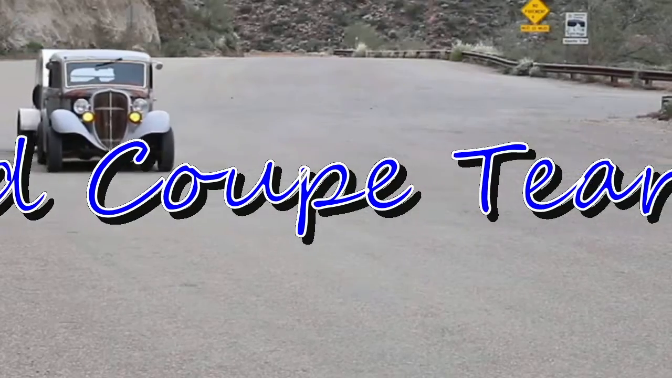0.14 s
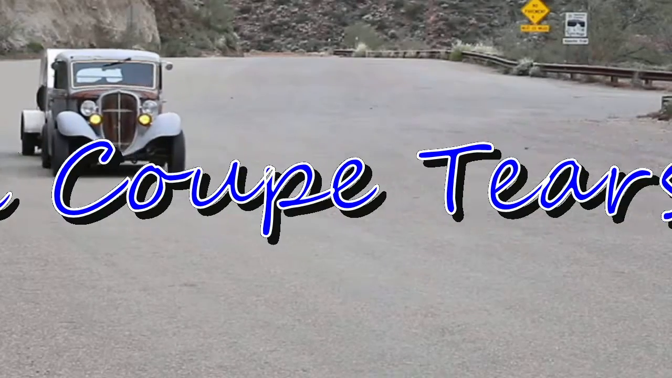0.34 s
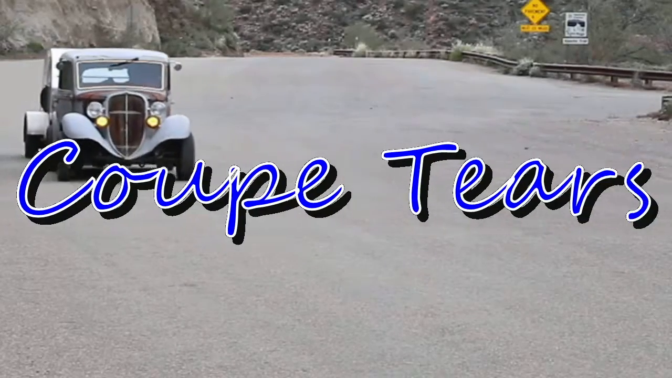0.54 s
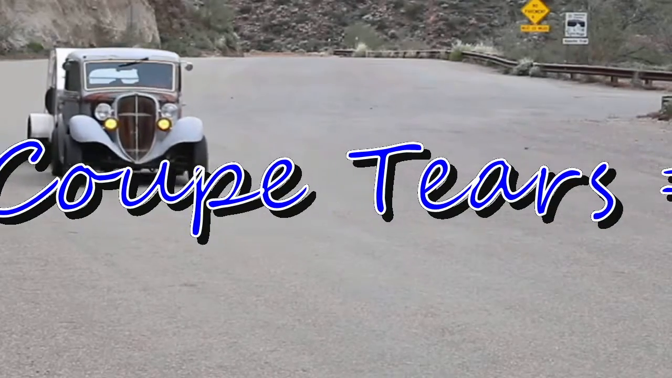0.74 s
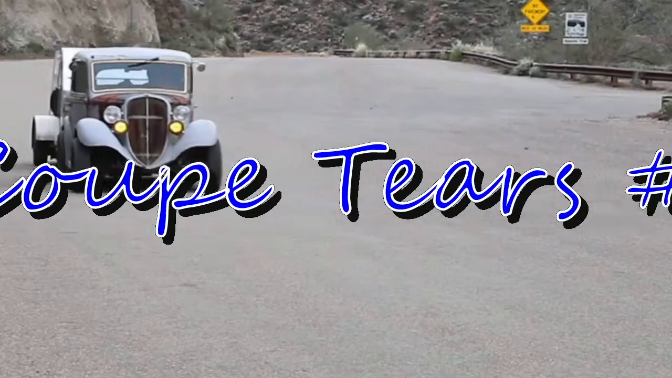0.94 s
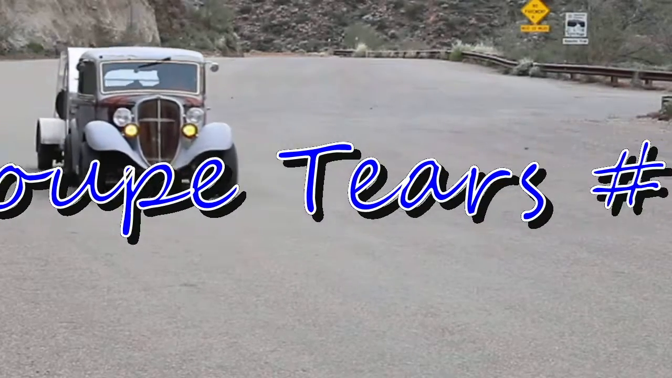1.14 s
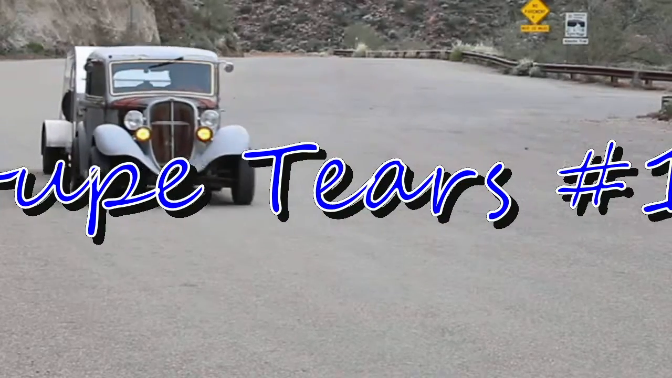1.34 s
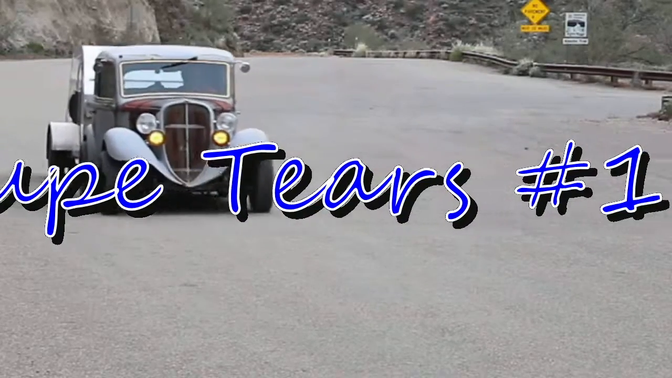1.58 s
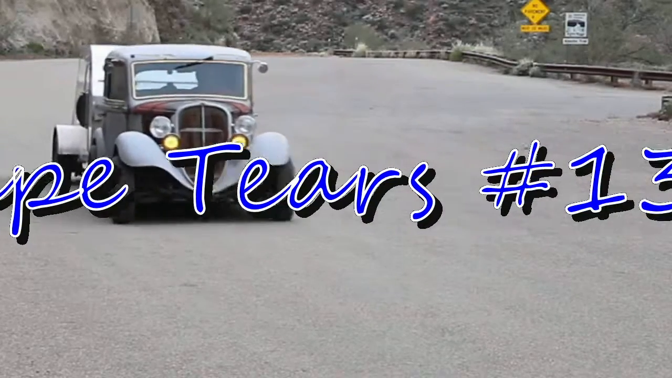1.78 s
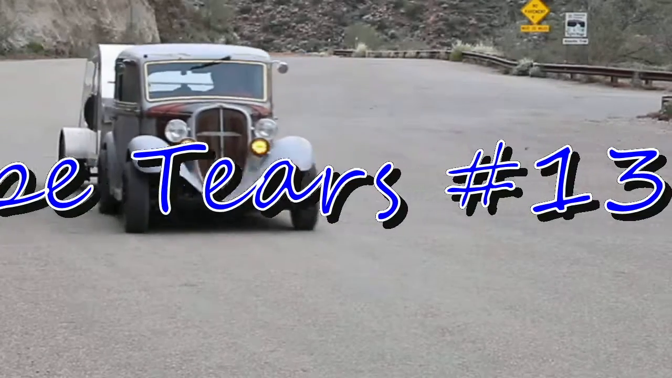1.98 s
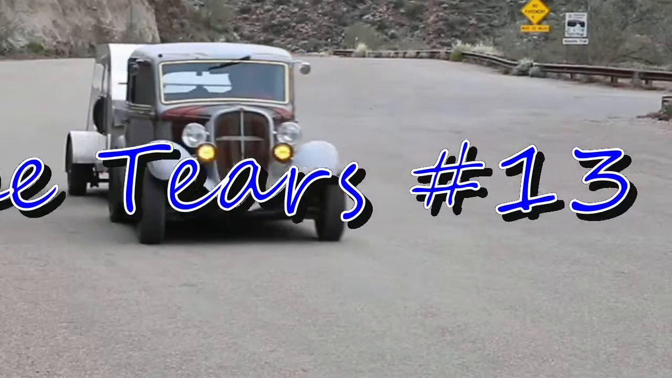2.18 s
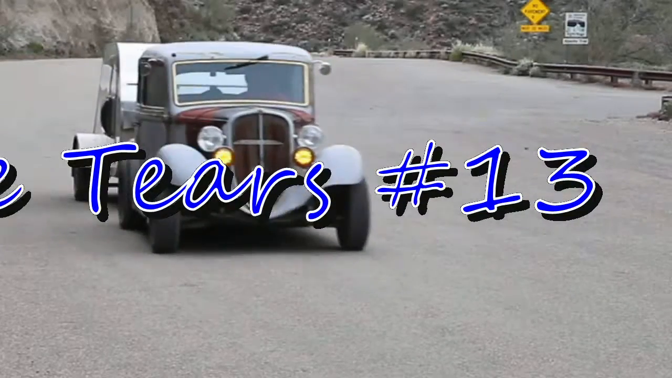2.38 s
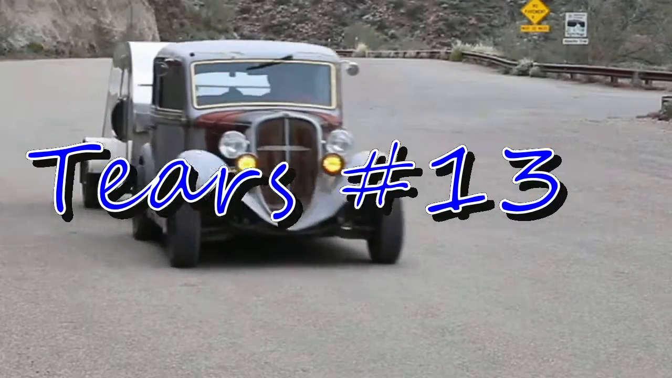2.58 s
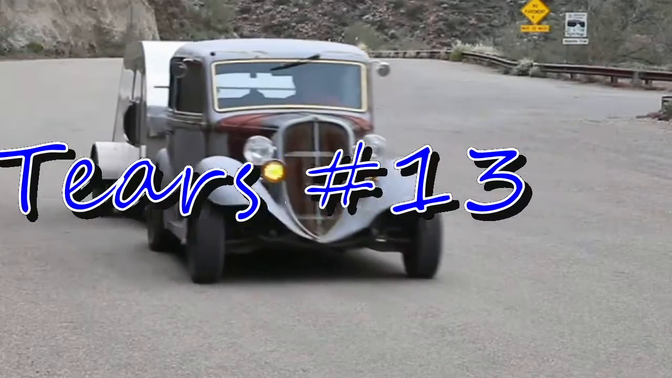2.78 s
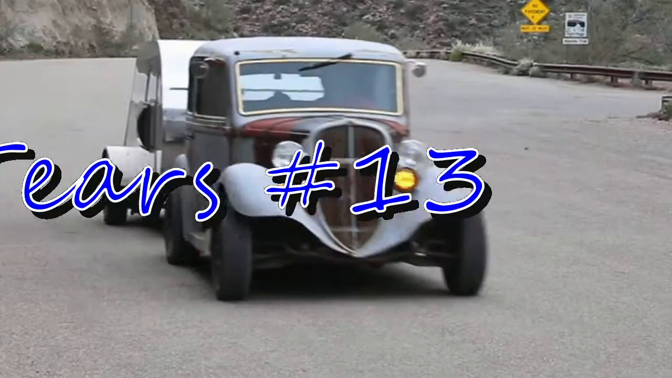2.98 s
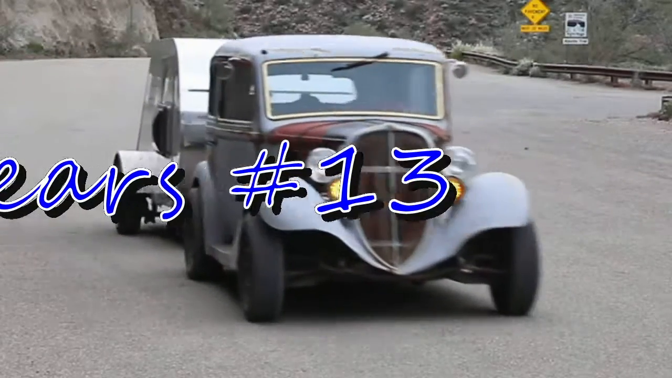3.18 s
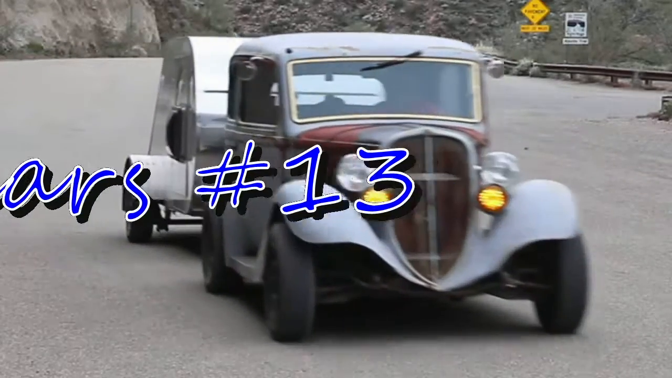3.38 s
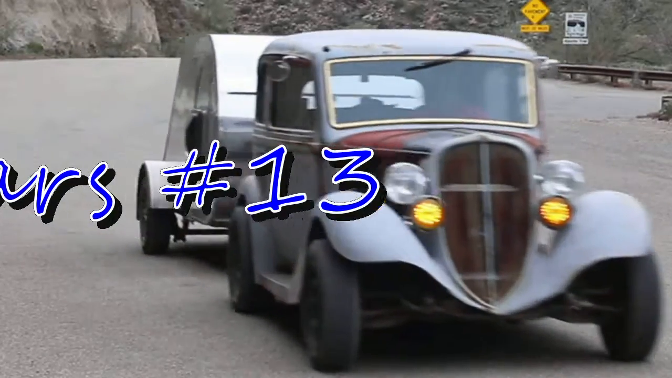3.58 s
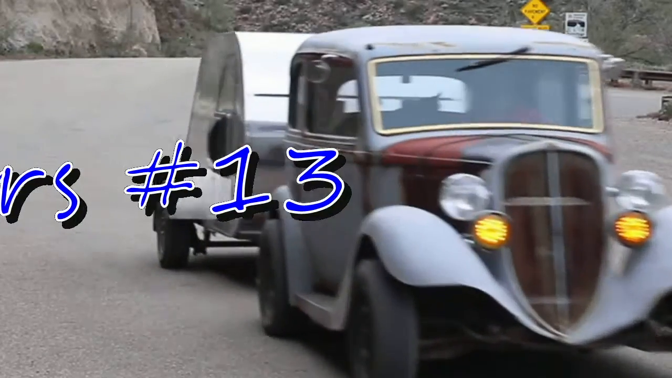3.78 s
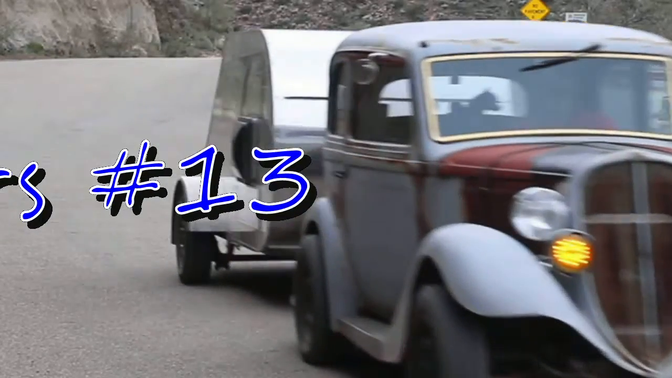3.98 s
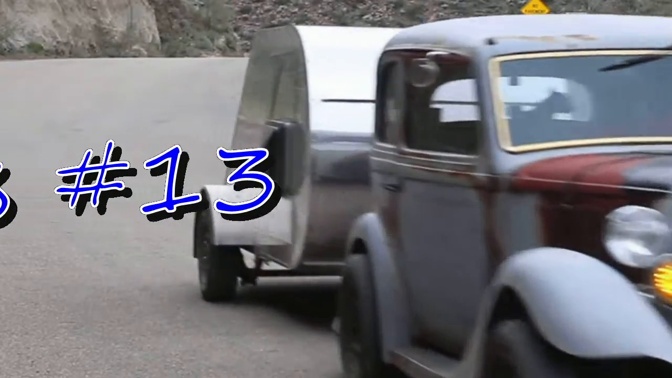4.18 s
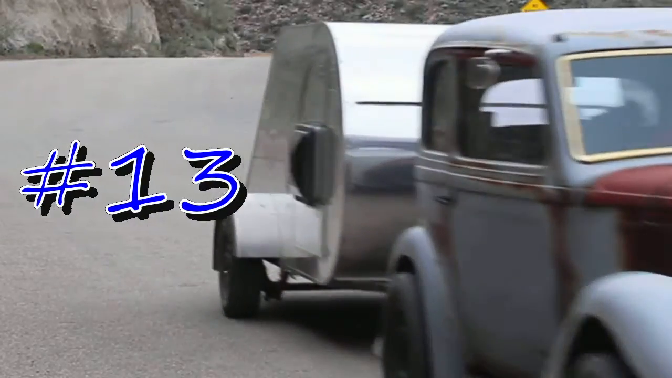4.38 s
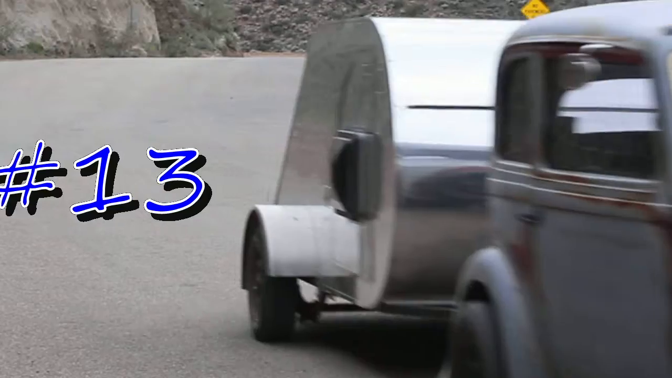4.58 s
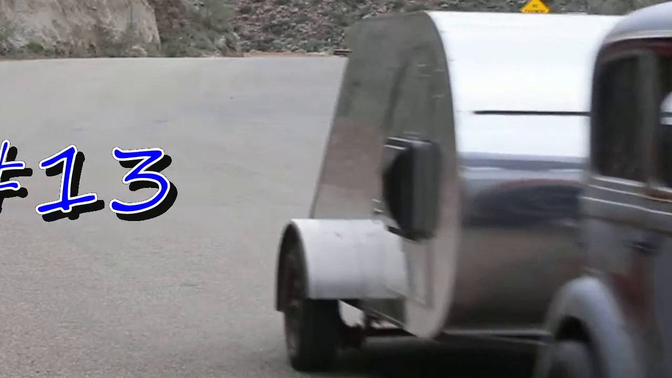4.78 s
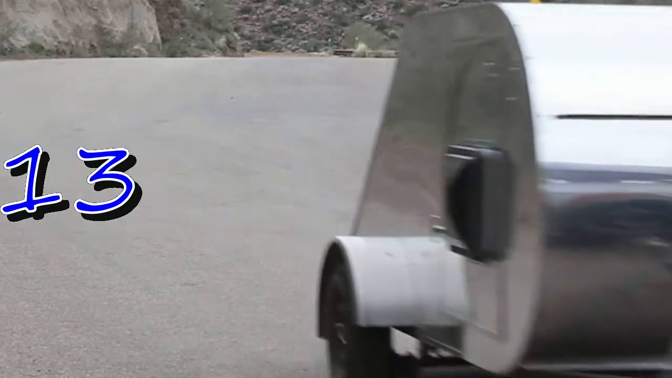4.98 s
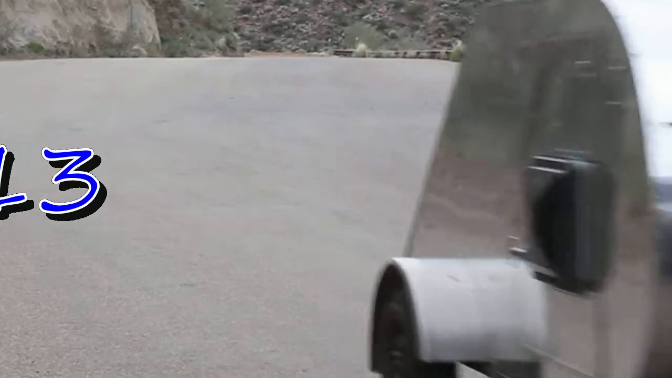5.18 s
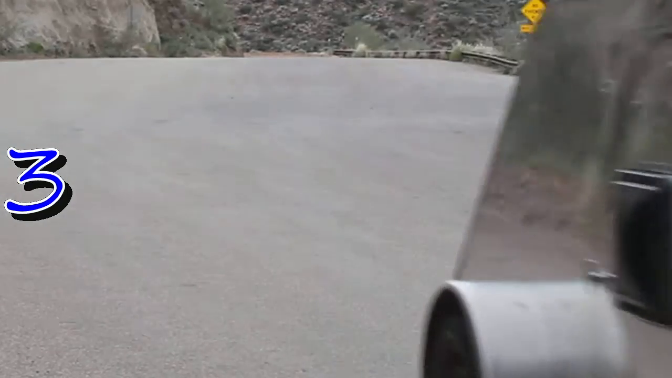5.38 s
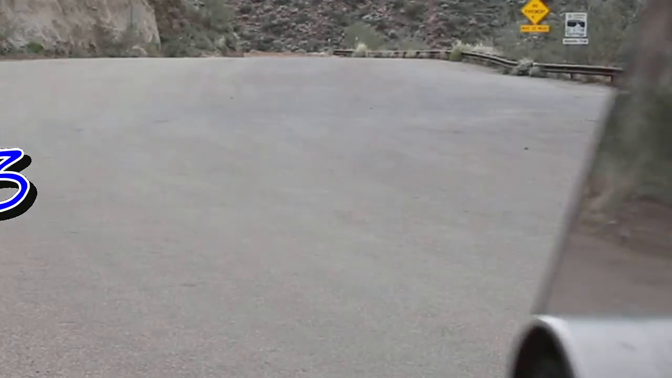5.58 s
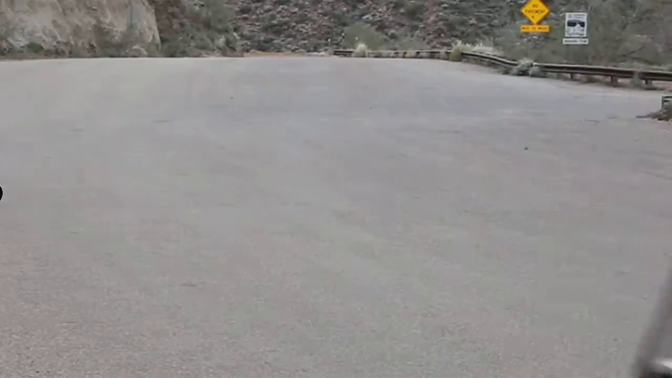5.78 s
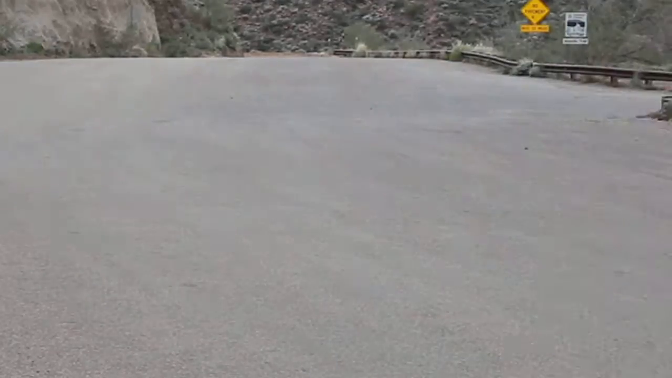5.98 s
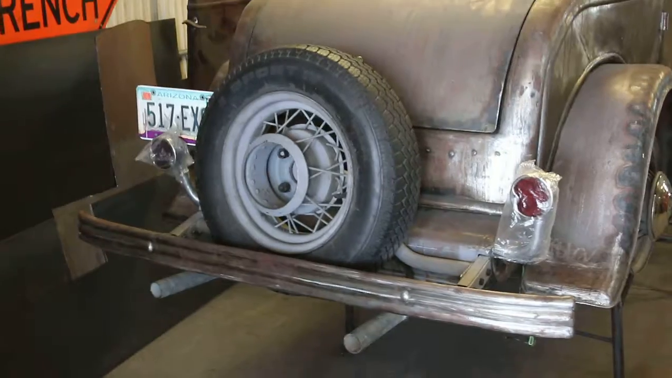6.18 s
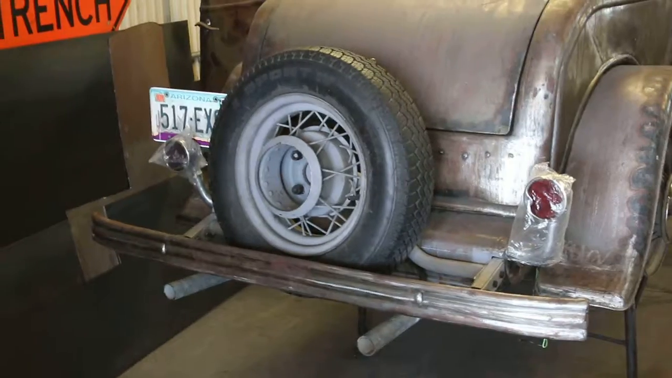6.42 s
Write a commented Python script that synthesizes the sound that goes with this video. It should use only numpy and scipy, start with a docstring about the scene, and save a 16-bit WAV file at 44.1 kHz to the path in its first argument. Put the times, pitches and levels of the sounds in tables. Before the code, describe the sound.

An old car rolls slowly past with a low exhaust drone, its tyres crunching grit and flicking small stones, then fades away.

```python
"""A low exhaust drone draws near as an old small car with a trailer rolls slowly by on a gritty mountain road.
The drone is a stack of engine orders; the engine bay whirrs, fan and gears whine, and the tyres crunch
grit and flick stones. Once past, the body hides the engine and puffs of gas ring in the tailpipe.
The road fades out and a workshop fades in: room noise, a machine hum and two small ticks."""
import sys
import numpy as np
from scipy import signal
from scipy.fft import rfft, irfft
from scipy.io import wavfile

SR = 44100
rng = np.random.default_rng(int(sys.argv[2]) if len(sys.argv) > 2 else 0)


def wrap_up_sound(samples):
    """Save the sound to the file named by the first command line argument, as 16-bit audio."""
    columns = np.atleast_2d(samples).T
    # keep every value between -1 and 1, then stretch to whole-number steps
    tamed = np.clip(columns, -1, 1)
    steps = np.round(tamed * 32767).astype(np.int16)
    wavfile.write(sys.argv[1], SR, steps)


N = 284445
T = np.arange(N) / SR
HZ = np.maximum(np.arange(N // 2 + 1) * SR / N, 1)
TAIL_TURNS_S = 4.996  # the car's tail starts to swing toward the listener


def from_db(db):
    """Decibels to gain."""
    return 10 ** (np.asarray(db) / 20)


def rms_one(x):
    """Scale to unit rms."""
    return x / np.sqrt(np.mean(x ** 2) + 1e-20)


def over_hz(points):
    """Draw a curve through (frequency, value) points on a log frequency axis."""
    hz, value = np.transpose(points)
    return np.interp(np.log(HZ), np.log(hz), value)


def drift(rate_hz):
    """Smooth random wander of unit rms."""
    return rms_one(irfft(rfft(rng.standard_normal(N)) / (1 + (HZ / rate_hz) ** 2), N))


def ring(clicks, hz, t60):
    """A resonator: each click starts a decaying sine of its own height."""
    radius, step = from_db(-60 / (t60 * SR)), 2 * np.pi * hz / SR
    return signal.lfilter([0, np.sin(step)], [1, -2 * radius * np.cos(step), radius ** 2], clicks + 1e-18)


def coloured(drive, gain):
    """Equalise a drive into stereo, left at unit rms; the right port hears it partly scattered."""
    # how alike the two microphone ports sound: (frequency [Hz], likeness [ratio, capped at 1])
    likeness = [(250, 1.3), (500, 0.85), (1000, 0.8), (2000, 0.6346), (4500, 0.71), (7500, 0.07),
                (12000, 0.8)]
    alike = np.clip(over_hz(likeness), 0, 1)
    direct, scattered = rfft(rms_one(drive)), rfft(rng.standard_normal(N))
    right = alike * direct + np.sqrt(1 - alike ** 2) * scattered
    pair = irfft(gain * np.array([direct, right]), N)
    return pair / pair[0].std()


def distance_db(s, speed_m_per_s=2.97, closest_m=2.73, closest_s=4.9):
    """Distance loss of a car rolling along a straight line, 0 dB at the closest point."""
    return -20 * np.log10(np.hypot(1, speed_m_per_s * (s - closest_s) / closest_m))


def swell_db(crest_s, apex_db, rise, fall, round_s=0.19):
    """A rise and a fall in dB per second, rounded off below the apex where the two slopes meet."""
    past = round_s * np.logaddexp(0, (T - crest_s) / round_s)
    return apex_db + rise * (T - crest_s) - (rise + fall) * past


def reflected(x, strength, rate_hz=1.52, count=5, longest_s=.005, wander_s=0.000493):
    """Bounces between road and underbody, whose paths shift as the car rolls, ripple the spectrum."""
    delays = rng.uniform(0.206, 1, count) * longest_s
    return x + strength * sum(np.interp(T - delay - wander_s * drift(rate_hz), T, x) for delay in delays)


def order_tone(turns, order, rough, rate_hz=9, silencer_spread=0.145):
    """One engine order, shaken by uneven firing; the silencer's phase shift smears each beat in time."""
    angle = 2 * np.pi * (order * turns + silencer_spread * order ** 2)
    in_phase = (1 + rough * drift(rate_hz)) * np.cos(angle)
    return -np.sqrt(2) * (in_phase + rough * drift(rate_hz) * np.sin(angle))


def workshop(level_db=-47, right_db=0.3):
    """Ringing room tone with a machine hum."""
    # hum partials: (frequency [Hz], rms level [dB])
    partials = [(119.5, -76), (143, -62), (222, -70), (357, -59)]
    # room tone spectrum: (frequency [Hz], relative level [dB])
    spectrum = [(30, -27), (80, -2), (140, 13.5), (190, 0), (245, 4.5), (290, -4.5), (360, 2), (550, -7),
                (1100, -12), (2000, -15), (2900, -15.5), (3650, -22.5), (4400, -29), (8000, -37.5),
                (16000, -51)]
    # room resonances: (frequency [Hz], width [Hz], lift [dB])
    resonances = [(1000, 50, 4), (1310, 45, 6), (1940, 49, 10), (3400, 88, 9)]
    hum = sum(from_db(db) * np.sqrt(2) * np.sin(2 * np.pi * (hz * T + rng.random()))
              for hz, db in partials)
    lift_db = sum(db / (1 + ((HZ - hz) / width) ** 2) for hz, width, db in resonances)
    room = coloured(rng.standard_normal(N), from_db(over_hz(spectrum) + lift_db))
    return from_db([[level_db], [level_db + right_db]]) * room + hum


def ticks(trim_db=-11):
    """Two light, hard touches in the workshop, each ringing for an instant."""
    # touches: (time [s], strike level [dB])
    touches = [(6.263, -33), (6.426, -31)]
    # modes they excite: (frequency [Hz], gain [dB], t60 [s])
    modes = [(2650, -2, .009), (3450, 3.5, 0.0082), (6160, -11, 0.0097)]
    clicks = np.zeros(N)
    for s, db in touches:
        clicks[int(s * SR)] = from_db(db)
    return sum(from_db(db + trim_db) * ring(clicks, hz, t60) for hz, db, t60 in modes)


def hiss(floor_db=-70.5):
    """A steady faint hiss, and a fine hiss from the front of the car that crests early."""
    # hiss spectrum: (frequency [Hz], relative level [dB])
    spectrum = [(3000, -23), (6500, 4.5), (8000, 4.5), (10000, -1.5), (15500, 2)]
    front_db = swell_db(crest_s=3.7, apex_db=-64, rise=4.5, fall=3.5)
    gain = np.hypot(from_db(floor_db), from_db(front_db))
    return gain * coloured(rng.standard_normal(N), from_db(over_hz(spectrum)))


def whine(turns):
    """High, unsteady orders of the fan and gears."""
    # swells: (order [x beat rate], crest [s], apex [dB], rise [dB/s], fall [dB/s])
    orders = [(14, 3.56, -52, 5, 0.3), (15, 3.5, -66, 3, 6), (17, 3.8, -54, 13, 7), (18, 5.0, -52, 5, 3)]
    return sum(from_db(swell_db(*swell)) * order_tone(turns, round(k), rough=0.55, rate_hz=9.7)
               for k, *swell in orders)


def engine_bay(turns, throb=0.049):
    """A mechanical whirr that throbs with the firing."""
    # whirr spectrum: (frequency [Hz], relative level [dB])
    spectrum = [(20, -8), (60, -25), (110, 4), (170, 0.5), (300, 6), (370, 4.5), (450, -1), (800, 0),
                (1000, -3.5), (1500, -16.5), (2500, -44), (6000, -38)]
    pulsed = rng.standard_normal(N) * (1 + throb * np.cos(2 * np.pi * turns))
    return coloured(pulsed, from_db(over_hz(spectrum)))


def chinks(turns, per_s, shake, count=32, spread_db=3.8):
    """Loose metal parts, shaken by the engine, chink densely at many pitches."""
    hits = rng.random(N) < per_s * (1 + shake * np.cos(2 * np.pi * turns)) / SR
    clicks = hits * from_db(spread_db * np.minimum(rng.exponential(1, N), 2.5)) * rng.choice([-1, 1], N)
    part = rng.integers(0, count, N)
    pitches = np.linspace(2000, 5000, count) * rng.uniform(.98, 1.02, count)
    return rms_one(sum(ring(clicks * (part == k), hz, t60=0.05) for k, hz in enumerate(pitches)))


def tyres(turns, grains_per_s=900, clump_db=6, grit=0.99, valve_tap=0.21, rattle=0.35):
    """Grit cracks in clumps under the tread, over a rolling hiss with valve taps and loose metal."""
    # crunch spectrum: (frequency [Hz], relative level [dB])
    spectrum = [(500, -1.5), (1000, 4), (1500, 6.5), (2200, 2), (3200, -0.5), (4200, -3.5), (5000, -6.5),
                (6000, -14), (7200, -20), (10000, -28.5), (16000, -51)]
    cracks = rng.random(N) < grains_per_s * from_db(clump_db * drift(14)) / SR
    sizes = from_db(np.minimum(rng.exponential(1, N), 4)) * rng.choice([-1, 1], N)
    rolling = rng.standard_normal(N) * (1 + valve_tap * np.cos(4 * np.pi * turns))
    tread = reflected(grit * rms_one(cracks * sizes) + rolling, strength=0.6)
    metal = rattle * chinks(turns, per_s=220, shake=0.95)
    return coloured(tread + metal, from_db(over_hz(spectrum)))


def pebbles(per_s=4, closest_db=-43, spread_db=1.5, centre_hz=3000, spray=0.084):
    """Small stones fly at random and sink quickly into the hiss with distance; yields rows for stones()."""
    for when, size, pitch in rng.random((round(per_s * TAIL_TURNS_S), 3)):
        s = when * TAIL_TURNS_S
        db = closest_db + 1.6 * distance_db(s) + spread_db * (2 * size - 1)
        yield s, db, centre_hz * 2 ** (.7 * (pitch - .5)), spray


def stones(boost_db=15, ring_cycles=3.02, spray_t60=0.17, right_far_db=6, right_near_db=-9):
    """A stone snaps out from under a tyre in one sharp swing, and a spray of crumbs scatters after it."""
    # the biggest stones: (time [s], relative level [dB], pitch [Hz], crumb spray [0-1])
    big_stones = [(1.1074, -45, 2350, 0.01), (1.8307, -46, 2500, 0.05), (1.8548, -49, 2400, 0.04),
                  (1.894, -50, 2840, 0.06), (2.1075, -45, 3280, 0.03), (2.1455, -44.5, 2310, 0.04),
                  (2.2455, -49.5, 2340, 0.08), (2.4844, -44, 2970, 0.05), (2.589, -42.5, 2900, 0.04),
                  (3.2786, -43, 2370, 0.04), (3.2878, -38, 2350, 0.03), (3.5427, -37, 2570, 0.02),
                  (3.8235, -36, 2870, 0.02), (4.1739, -36.5, 3060, 0.05), (4.2453, -28, 2320, 0.02),
                  (4.2594, -31.5, 2330, 0), (4.596, -26.5, 2430, 0.02), (4.6199, -37, 3000, 0),
                  (4.7004, -36.5, 2840, 0.01), (4.8824, -34, 3026, 0), (5.3916, -34.5, 2380, 0.05),
                  (5.4454, -34, 2780, 0.03)]
    out, age = np.zeros((2, N)), np.arange(SR // 6) / SR
    for s, db, hz, spray in [*big_stones, *pebbles()]:
        right_db = right_far_db + (right_near_db - right_far_db) * from_db(distance_db(s))
        crumbs = spray * rng.standard_normal((2, len(age))) * from_db(-60 * age / spray_t60)
        snap = ring(signal.unit_impulse(len(age)) + crumbs, hz, ring_cycles / hz)
        start = int(s * SR)
        out[:, start:start + len(age)] += from_db(db + boost_db) * from_db([[0], [right_db]]) * snap
    return signal.sosfilt(signal.butter(2, [1000, 6000], "band", fs=SR, output="sos"), out)


def tailpipe(turns, fall_db=16):
    """Each beat lets out a puff of gas that rings in the pipe, jingles it and dies before the next."""
    # pipe resonances: (frequency [Hz], width [Hz], relative level [dB])
    resonances = [(980, 180, 8), (1520, 480, 5.5), (2820, 470, 3.5), (3830, 470, 2.5), (4760, 710, -5.5),
                  (6500, 2900, -17.5)]
    gas = reflected(rng.standard_normal(N), strength=0.56, rate_hz=5.5)
    jingle = 0.57 * chinks(turns, per_s=300, shake=0.7)
    puffs = from_db(-fall_db * (turns % 1) + drift(27)) * (gas + jingle)
    power = sum((from_db(db) / (1 + ((HZ - hz) / width) ** 2)) ** 2 for hz, width, db in resonances)
    return coloured(puffs, np.sqrt(power))


def rock_echo(first_period_s=0.335, slowing=0.3):
    """Gain of a tone beating ever more slowly against its rock-face echo, until the direct sound wins."""
    cycles = np.log1p(slowing * T / first_period_s) / slowing
    echo_share = np.interp(T, [2.65, 3.15], [0.88, 0.15])
    return np.abs(1 - echo_share * np.exp(2j * np.pi * cycles)) / (1 + echo_share)


def exhaust(turns, dip_width_s=0.085):
    """The low drone: four strong orders and some weak, rougher ones; no two beats are equally strong."""
    # swells: (order [x beat rate], crest [s], apex [dB], rise [dB/s], fall [dB/s], waver [dB])
    strong_orders = [(2, 4.67, -32.5, 3.5, 5, 0.36), (3, 4.38, -30.5, 2, 8.5, 0.57),
                     (4, 4.4, -49, 0, 18, 2.1), (5, 5.07, -43, -1.2, 21, 0.1)]
    # riding on the 3rd order: (order [x beat rate], far level [dB re 3rd], near level [dB re 3rd])
    weak_orders = [(1, -20, -24.5), (6, -30, -23), (7, -11.5, -33.5), (8, -24.5, -21.5), (10, -23.5, -29.5)]
    # the drone dips briefly: (time [s], depth [dB])
    dips = [(2.07, 2.5), (3.15, 3.5), (4.64, 2.7), (5.4, 2)]
    gains = {round(k): from_db(swell_db(*swell) + waver_db * drift(2.4))
             for k, *swell, waver_db in strong_orders}
    gains[2] *= rock_echo()
    strong = sum(gain * order_tone(turns, k, rough=.04, rate_hz=20) for k, gain in gains.items())
    near = np.interp(T, [.8, 3.8], [0, 1])
    weak = sum(from_db(far_db + near * (near_db - far_db)) * order_tone(turns, round(k), rough=0.031 * k)
               for k, far_db, near_db in weak_orders)
    beat_db = rng.normal(0, .7, int(turns[-1]) + 2)
    uneven_db = np.interp(turns, np.arange(len(beat_db)), beat_db)
    dip_db = sum(db * np.exp(-((T - s) / dip_width_s) ** 2) for s, db in dips)
    return (strong + gains[3] * weak) * from_db(uneven_db - dip_db)


def microphone_ports(pair, turn_hz=135, port_hz=7600, port_width_hz=4200):
    """The right side is weaker; its phase turns over above the bass and again at the port resonance."""
    # right port response: (frequency [Hz], gain [dB])
    response = [(60, -5.5), (1000, -5), (2400, -1), (4400, 0), (5800, 0), (7500, -5.5), (10000, -0.5),
                (15000, -2.5)]
    bass_turn = (1 - 1j * HZ / turn_hz) / (1 + 1j * HZ / turn_hz)
    port = port_hz ** 2 - HZ ** 2 + 1j * HZ * port_width_hz
    right = irfft(rfft(pair[1]) * from_db(over_hz(response)) * bass_turn * np.conj(port) / port, N)
    return np.array([pair[0], right])


def car(bay_db=-41, tyres_db=-41.97, pipe_db=-52, pipe_rise_db_per_s=12.5, hidden_db=7.5, swing_s=0.54):
    """The pass-by: as the tail swings round, the body hides the engine and puffs replace the crunch."""
    beat_hz = 47.82 - 0.79 * T + 0.9 * np.exp(-T / 0.9)  # the engine slows, a little faster at first
    turns = np.cumsum(beat_hz) / SR  # one turn per exhaust beat
    loss_db = distance_db(T)
    behind = np.clip((T - TAIL_TURNS_S) / swing_s, 0, 1)
    shadow = from_db(-hidden_db * behind)
    whirr = from_db(bay_db + 0.57 * loss_db) * engine_bay(turns)
    crunch = np.sqrt(1 - behind) * from_db(tyres_db + 1.145 * loss_db) * tyres(turns)
    puffs = np.sqrt(behind) * from_db(pipe_db + pipe_rise_db_per_s * (T - TAIL_TURNS_S)) * tailpipe(turns)
    return microphone_ports(hiss() + exhaust(turns) + shadow * (whirr + whine(turns))
                            + crunch + puffs + stones())


def scene(fade_start_s=5.5, change_s=6.1, pause_s=0.018):
    """The road fades to a moment of silence, then the workshop fades in."""
    fade_out = np.interp(T, [fade_start_s, change_s - pause_s / 2], [1, 0])
    fade_in = np.interp(T, [change_s + pause_s / 2, T[-1]], [0, 1]) ** 1.01
    return fade_out * car() + fade_in * workshop() + ticks()


def record(dry):
    """A steep low-pass shaves off the very top."""
    return signal.sosfilt(signal.ellip(12, .1, 90, 15800, fs=SR, output="sos"), dry)


dry = scene()
out = record(dry)
wrap_up_sound(out)
```